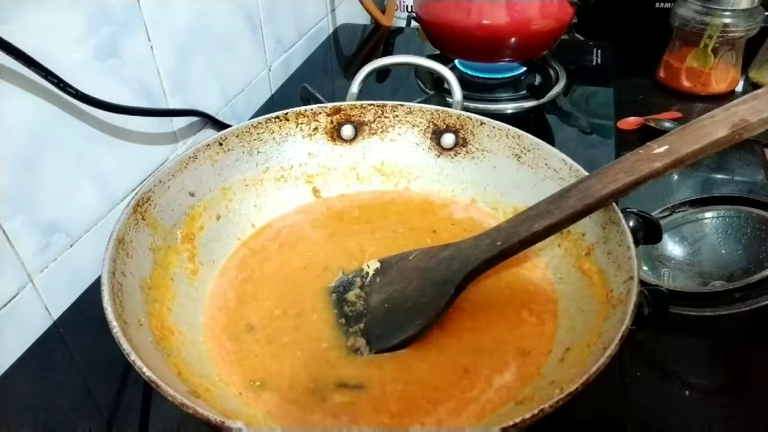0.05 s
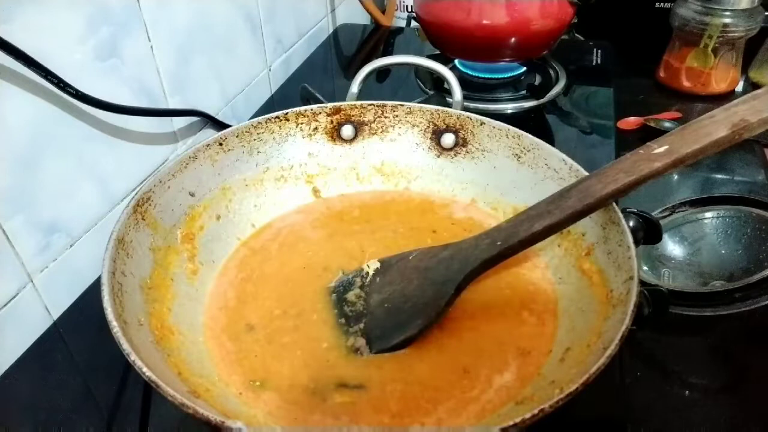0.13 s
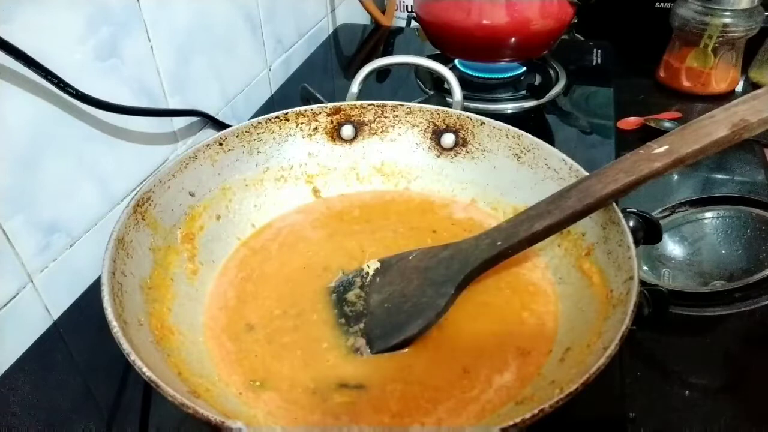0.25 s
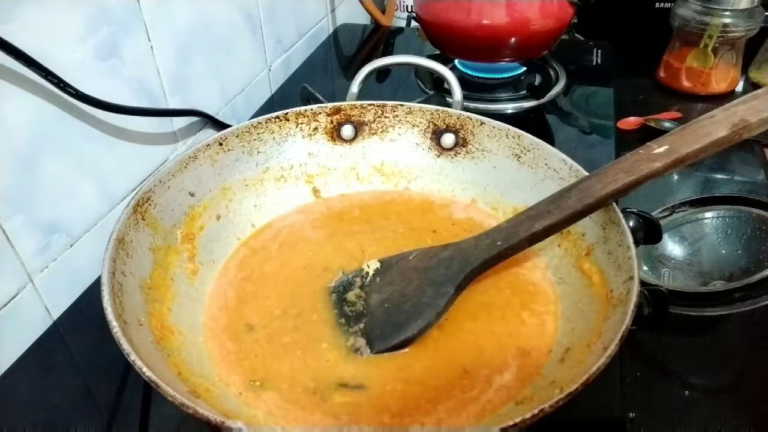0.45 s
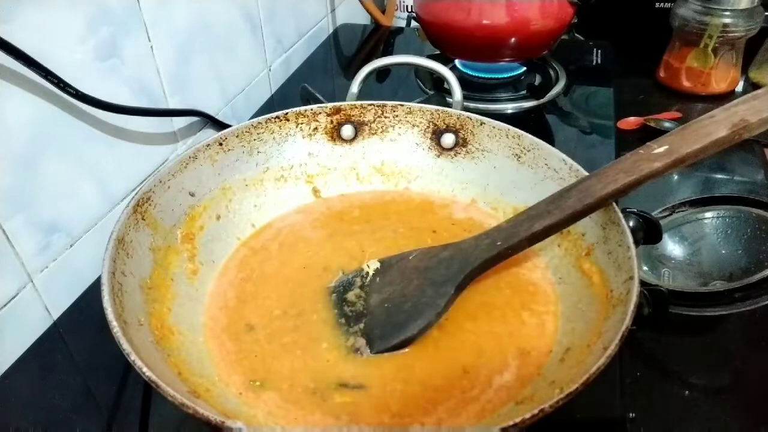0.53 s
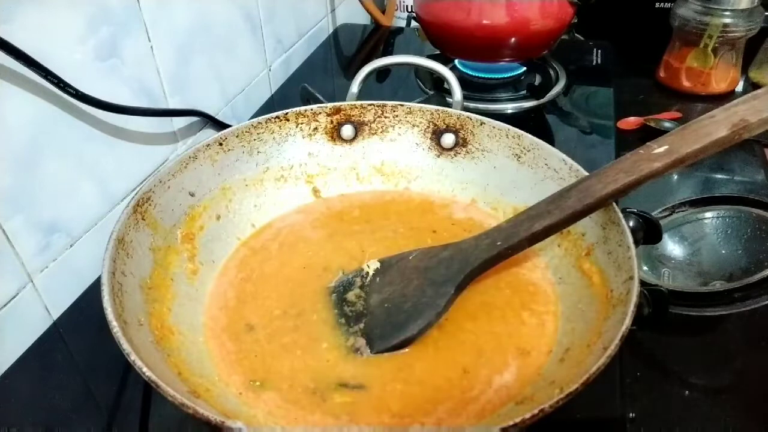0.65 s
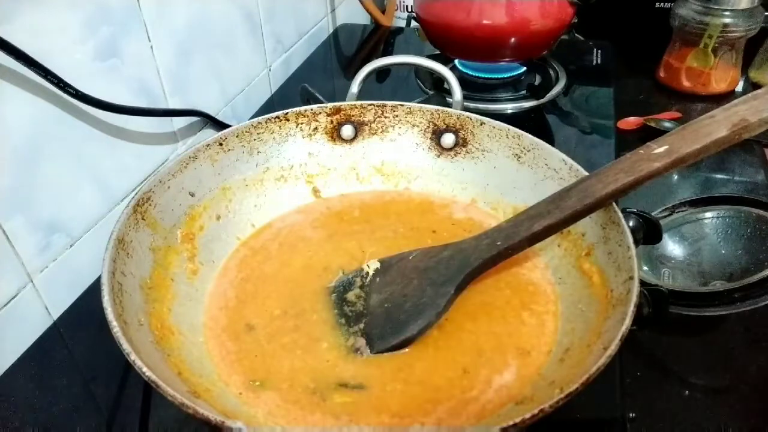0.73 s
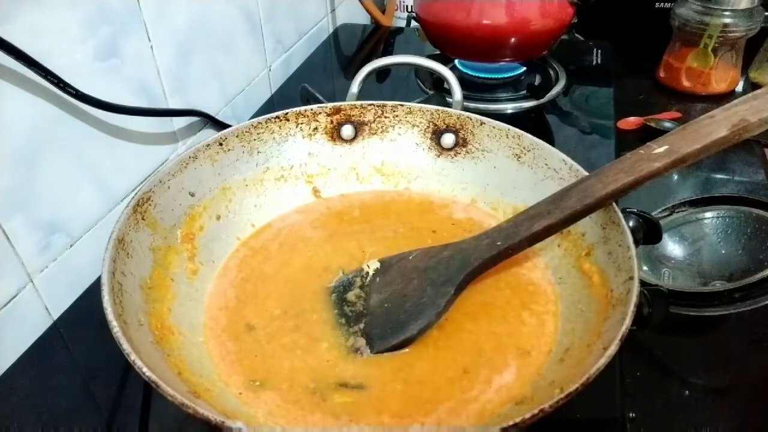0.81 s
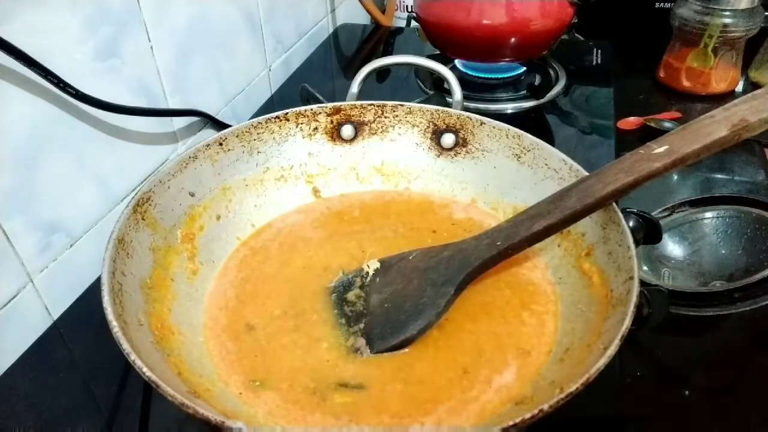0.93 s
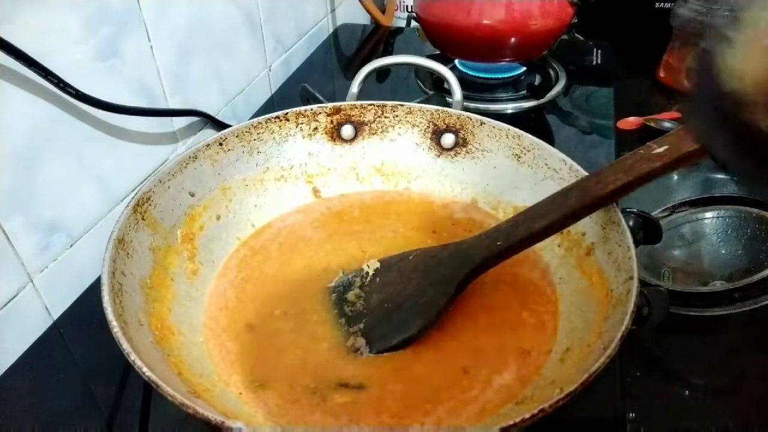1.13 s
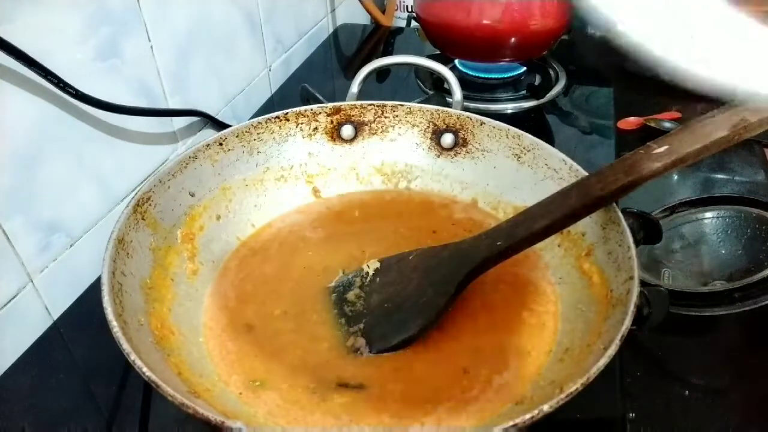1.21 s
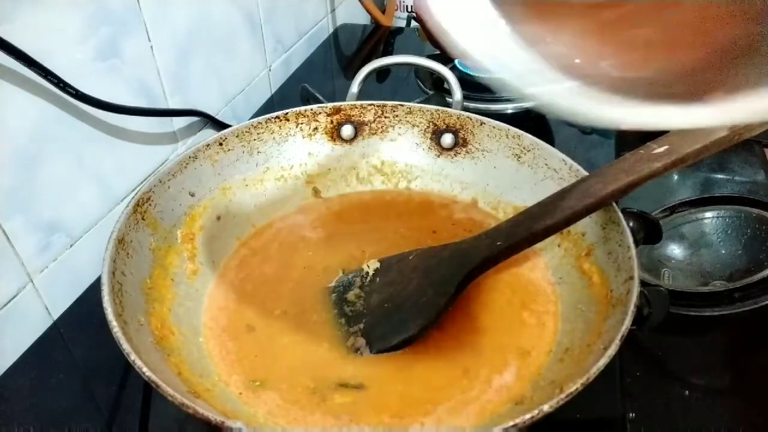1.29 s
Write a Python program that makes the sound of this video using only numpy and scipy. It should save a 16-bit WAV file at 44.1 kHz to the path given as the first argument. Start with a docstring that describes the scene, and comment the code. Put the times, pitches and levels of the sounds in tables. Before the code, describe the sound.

Sauce simmers in a metal pan throughout, with soft bubbling, a light hiss and a steady low fan hum. At about 0.25 seconds a hollow vessel knocks down on the counter nearby, louder than the rest, then scrapes and rocks to rest by 0.7 seconds with light rustles. From about 1 second, a faint metallic ring wavers with a few small ticks. The kitchen sounds small and hard-walled.

```python
"""Thin sauce simmers in a steel pan over a gas flame, with a fan motor humming in a hard-walled kitchen.
Bubbles burst and ring briefly over a noise bed of flame, fan air and fizz. A hollow vessel is put down
on the counter nearby, drags and rocks to rest, each contact ringing the modes of both. Light rustles,
ticks and a soft sagging note follow, and a thin metallic ring rises near the end."""
import sys
import numpy as np
from scipy import signal
from scipy.io import wavfile

SR = 44100
rng = np.random.default_rng(int(sys.argv[2]) if len(sys.argv) > 2 else 0)


def output_pcm(signal):
    """Save a mono or channel-first signal as 16-bit PCM at the path in sys.argv[1].

    Samples are clipped to [-1, 1] before scaling.
    """
    pcm = np.clip(np.atleast_2d(signal).T, -1, 1) * 32767
    wavfile.write(sys.argv[1], SR, np.round(pcm).astype(np.int16))


N = 59535
TIME = np.arange(N) / SR


def from_db(db):
    return 10 ** (np.asarray(db) / 20)


def unit_rms(x):
    return x / np.sqrt(np.mean(x ** 2) + 1e-20)


def butter(x, order, hz, kind):
    return signal.sosfilt(signal.butter(order, hz, kind, fs=SR, output="sos"), x)


def at_hz(curve, hz):
    """A curve's value at hz, on a log-frequency axis."""
    freqs, values = np.transpose(curve)
    return np.interp(np.log(hz), np.log(freqs), values)


def drift(rate_hz):
    """Smooth random modulation of rms 1."""
    pole = np.exp(-80 * np.pi * rate_hz / SR)   # one step every 40 samples
    slow = signal.lfilter([1], [1, -2 * pole, pole * pole], rng.standard_normal(N // 40 + 2002))[2000:]
    return np.interp(np.arange(N) / 40, np.arange(len(slow)), unit_rms(slow))


def resonate(drive, hz, t60):
    """One damped mode: a unit click sets a sine of height 1 ringing."""
    r, w = from_db(-60 / (t60 * SR)), 2 * np.pi * hz / SR
    return signal.lfilter([0, np.sin(w)], [1, -2 * r * np.cos(w), r * r], drive + 1e-18)


def diffuse_noise(gain_at, correlation):
    """Third-octave bands of mid/side noise: gain_at(hz) shapes each, correlation sets its width."""
    out, edges = 0, 25 * 2 ** (np.arange(30) / 3)
    white = rng.standard_normal((2, 2, N + 4000))
    for k, (low, high) in enumerate(zip(edges, edges[1:])):
        mid, side = butter(white[k % 2], 2, [low, high], "band")[:, -N:]
        hz = np.sqrt(low * high)
        alike = np.clip(at_hz(correlation, hz), -1, 1)
        out += gain_at(hz) * (np.sqrt(1 + alike) * mid + np.sqrt(1 - alike) * side * [[1], [-1]])
    return out


# EQ of the bed: f/Hz, relative level/dB
BED_EQ = [(25, -32), (60, -31), (100, -39), (140, -12.5), (230, -5.5), (330, -7.5), (500, -9.5), (620, -17),
          (1000, -20.5), (1800, -23), (4000, -26), (7000, -31), (10500, -30.5), (15800, -40.5)]
# slow level curve of the bed's treble, taken about its mean: t/s, level/dB
TREBLE_LEVEL = [(0, -54.5), (.2, -56.5), (.3, -51), (.42, -52.5), (.52, -55.5), (.62, -55), (0.762, -54.5),
                (.9, -58.5), (1.03, -54.5), (1.15, -56.5), (1.35, -55.5)]
# stereo image of the bed and the rustles: f/Hz, left-right correlation
NOISE_IMAGE = [(60, 0.7), (130, 1), (290, 0.099), (640, 0.46), (1410, -0.33), (3100, 0.14), (6820, -0.072),
               (15000, 0.068)]
def simmer(level_db=-46, flicker_db=1.6, treble_from_hz=1500):
    """Flame, fan air and fizz: a steady noise bed whose bands flicker."""
    times, ride_db = np.transpose(TREBLE_LEVEL)
    treble_db = np.interp(TIME, times, ride_db - ride_db.mean())
    sway_db = .5 * drift(8.0)   # all bands together

    def band_gain(hz):
        eq_db = at_hz(BED_EQ, hz) + treble_db * (hz > treble_from_hz)
        return from_db(eq_db + sway_db + flicker_db * drift(9.3))
    return from_db(level_db) * unit_rms(diffuse_noise(band_gain, NOISE_IMAGE))


def bubbles(per_s=220, level_db=-60.5, t60_cycles=13.6):
    """Soft bubbles burst at random, each ringing a few cycles at one of 16 pitches."""
    strengths = from_db(5.4 * np.minimum(rng.exponential(1, N), 2)) * rng.choice([-1, 1], N)
    bursts = strengths * (rng.random(N) < per_s / SR)
    pitch_index = rng.integers(0, 16, N)
    pops = sum(resonate(bursts * (pitch_index == k), hz, t60_cycles / hz)
               for k, hz in enumerate(np.geomspace(260, 1100, 16)))
    softened = signal.lfilter([.1], [1, -.9], pops)
    return from_db(level_db) * unit_rms(softened)


# tones of the fan motor: f/Hz, rms level/dB
MOTOR_TONES = [(150, -59.5), (232.5, -49.5), (311, -59.5), (466, -56.5), (522, -62.5)]
def fan_hum(waver_hz=1.24, waver_db=1.5, side_db=-34):
    """Near-mono motor tones that waver a little in pitch and level."""
    out = 0
    for hz, db in MOTOR_TONES:
        phase = 2 * np.pi * (np.cumsum(hz + waver_hz * drift(4.8)) / SR + rng.random())
        tone = np.sin(phase) + from_db(side_db) * np.cos(phase) * [[1], [-1]]
        out += np.sqrt(2) * from_db(db + waver_db * drift(7.7)) * tone
    return out


# the vessel lands and rocks: t/s, vessel drive/dB, counter drive/dB, contact length/ms
CONTACTS = [(0.2469, -4.5, -17, 0.69), (0.2608, -36, -12, 2.5), (.279, -23, -17.5, 0.96),
            (.296, -18.5, -31, 0.65), (.316, -9.5, -22, 0.83), (0.3314, -40, -14.5, 1.53),
            (.348, -14.5, -33, 1.25), (0.366, -14, -13.5, 1.38), (.381, -19.5, -51, 0.99),
            (.397, -17, -21, 1.82), (0.407, -29.5, -17, 0.94), (.431, -37, -18.5, 1.52),
            (.457, -28, -23, 2.3), (0.47, -39, -16, 4.36), (.497, -49, -23.5, 5.1), (.536, -45, -56, 0.47),
            (0.562, -60, -37, 1.54), (0.627, -34.5, -38.5, 1.4)]
def knocks(crack_db=-30.5, crack_t60_s=0.049, crack_db_per_db=2.2):
    """Force pulses on vessel and counter, and the envelope of the crack that tops hard hits."""
    forces, crack = np.zeros((2, N)), np.zeros(N)
    landing_db = CONTACTS[0][1]
    for start, vessel_db, counter_db, ms in CONTACTS:
        progress = np.clip((TIME - start) / (ms / 1000), 0, 1)
        pulse = np.sin(np.pi * progress) ** 2 * 2000 / (ms * SR)   # unit area
        forces += from_db([[vessel_db], [counter_db]]) * pulse
        peak_db = crack_db + crack_db_per_db * (vessel_db - landing_db)
        crack += from_db(peak_db - 60 * np.maximum(TIME - start, 0) / crack_t60_s) * (TIME >= start)
    return forces, crack


# the base drags as it rocks: t/s, vessel drive/dB, counter drive/dB, scrape level/dB
DRAG_RIDE = [(0.247, -93, -95, -60), (0.262, -64, -77, -58), (0.29, -58, -69, -49),
             (0.308, -73, -73.5, -50), (0.325, -61, -69.5, -54), (0.345, -64, -68, -68),
             (0.376, -59.5, -68, -53), (0.42, -69.5, -72, -61), (0.45, -78.5, -65.5, -69),
             (0.474, -81, -64, -68), (0.509, -79, -74, -58), (0.55, -95, -75.5, -79)]
def drag(lowpass_hz=1024):
    """Friction: dull rough forces on vessel and counter, and the envelope of a bright scrape."""
    times, *lanes_db = np.transpose(DRAG_RIDE)
    *drives, scrape = from_db([np.interp(TIME, times, db, left=-150, right=-150) for db in lanes_db])
    roughness = unit_rms(butter(rng.standard_normal((2, N)), 2, lowpass_hz, "low"))
    return drives * roughness, scrape


# modes of the vessel and of the counter: f/Hz, level/dB, t60/s, pan (left minus right)/dB
VESSEL_MODES = [(448, -7.5, 0.046, -5), (542, -10, 0.088, 1), (630, -4, 0.09, -6.5), (660.4, -11, 0.19, 9),
                (1000, -20.5, 0.079, -7), (1136, -12.5, 0.06, 2), (1177, -9, 0.055, 6.5),
                (1390, -31, 0.049, -2), (1578, -12, 0.026, -2)]
COUNTER_MODES = [(146, -28, 0.051, 5), (219.8, -13, 0.23, 2.5), (256.7, -7.5, 0.12, 0),
                 (323.5, -4.5, 0.059, -0.5), (374, -9, 0.056, -6)]
# EQ dips where the vessel radiates little: low f/Hz, high f/Hz, share removed (0-1)
BODY_DIPS = [(693, 970, 0.88), (1227, 1410, 0.58)]
def vessel(hiss_band_hz=(1880, 5100), left_lag_s=0.000264):
    """Knocks and drag ring the hollow vessel and the counter; crack and scrape add a bright edge."""
    knock_forces, crack = knocks()
    drag_forces, scrape = drag()
    hiss = unit_rms(butter(rng.standard_normal((2, N)), 1, hiss_band_hz, "band"))
    body = 0
    for force, modes in zip(knock_forces + drag_forces, (VESSEL_MODES, COUNTER_MODES)):
        for hz, db, t60, pan_db in modes:
            drive = np.gradient(force) * SR / (2 * np.pi * hz)
            body += from_db([[db + pan_db / 2], [db - pan_db / 2]]) * resonate(drive, hz, t60)
    for low_hz, high_hz, share in BODY_DIPS:
        body -= share * butter(body, 1, [low_hz, high_hz], "band")
    left, right = body + (crack + scrape) * hiss
    return np.array([np.interp(TIME - left_lag_s, TIME, left), right])


# rustle cues: peak t/s, rise/s, fall/s, level/dB
RUSTLE_CUES = [(0.471, 0.042, 0.037, -41), (0.558, 0.022, 0.041, -45.5), (0.687, 0.068, 0.043, -48.5)]
# EQ of the rustles: f/Hz, relative level/dB
RUSTLE_EQ = [(1060, 0.5), (1800, -0.5), (2780, -3.5), (3280, -7), (3590, 0), (6250, -2.5), (6850, 2),
             (12400, -4), (15800, -11)]
def rustles(flicker_db=3.3):
    """Light swells of bright, flickering noise."""
    swells = sum(from_db(db) * np.exp(-((TIME - peak) / np.where(TIME < peak, rise, fall)) ** 2)
                 for peak, rise, fall, db in RUSTLE_CUES)

    def band_gain(hz):
        return from_db(at_hz(RUSTLE_EQ, hz) + flicker_db * drift(31.0)) * (hz > RUSTLE_EQ[0][0])
    return swells * unit_rms(diffuse_noise(band_gain, NOISE_IMAGE))


# tick cues: t/s, f/Hz, resonance width/Hz, level/dB, t60/s
TICK_CUES = [(.551, 7140, 900, -46.5, 0.088), (.557, 4500, 220, -54, 0.25), (0.652, 3900, 448, -47, 0.1),
             (.921, 4800, 300, -62, 0.081), (1.088, 3710, 60, -60, 0.2), (1.148, 3760, 70, -54, 0.25),
             (1.268, 5360, 970, -46.5, 0.29), (1.267, 4800, 250, -50, 0.08), (1.268, 8950, 1200, -54, 0.24),
             (1.316, 2050, 300, -50.5, 0.058)]
def ticks():
    """Small rough ticks: dying bursts of noise, pitched by two passes through a resonance."""
    out = 0
    for start, hz, width_hz, db, t60 in TICK_CUES:
        filter_t60 = np.log(1000) / (np.pi * width_hz)
        noise = resonate(resonate(rng.standard_normal((2, N)), hz, filter_t60), hz, filter_t60)
        envelope = from_db(db - 60 * np.maximum(TIME - start, 0) / t60) * (TIME >= start)
        out += envelope * unit_rms(noise)
    return out


def settling_note(peak_s=0.662, rise_s=0.03, fall_s=0.045, level_db=-35.5,
                  centre_hz=222, sag_hz=16, sag_s=0.012):
    """A soft low note swells and sags in pitch as the vessel settles."""
    t = TIME - peak_s
    hz = centre_hz - sag_hz * np.tanh(t / sag_s)
    swell = np.exp(-(t / np.where(t < 0, rise_s, fall_s)) ** 2)
    return from_db(level_db) * swell * np.sin(2 * np.pi * np.cumsum(hz) / SR)


# fader rides on the ring: t/s, main tone level/dB, lower tone level/dB
RING_RIDE = [(0.95, -77, -85), (0.992, -72, -87), (1.026, -58.5, -80), (1.056, -58, -74), (1.094, -63, -62),
             (1.144, -62, -62), (1.166, -49, -61), (1.204, -55.5, -70), (1.23, -63, -61),
             (1.264, -47.5, -64), (1.298, -68, -71), (1.314, -53, -67), (1.35, -61, -59)]
# main and lower tone of the ring: f/Hz, rms pitch waver/Hz
RING_TONES = [(3362, 10), (3030, 10)]
def thin_ring(flutter_db=2.5, flutter_hz=50):
    """Two thin metallic tones that waver, flutter, and come and go."""
    times, *lanes_db = np.transpose(RING_RIDE)
    spread = np.array([[0], [0.25]])   # right leads by a quarter cycle
    out = 0
    for (hz, waver_hz), db in zip(RING_TONES, lanes_db):
        envelope = from_db(np.interp(TIME, times, db, left=-120) + flutter_db * drift(flutter_hz))
        cycles = np.cumsum(hz + waver_hz * drift(26.0)) / SR + rng.random()
        out += envelope * np.sin(2 * np.pi * (cycles + spread))
    return np.sqrt(2) * out


# reverb time of the kitchen: f/Hz, t60/s
REVERB_DECAY = [(120, .35), (250, .4), (600, .27), (1200, .24), (3000, .4), (8000, .3)]
# stereo image of the reverb: f/Hz, left-right correlation
REVERB_IMAGE = [(60, 0.52), (130, 0.74), (290, 1), (640, 0.58), (1410, -0.98), (3100, 0.28), (6820, 1),
                (15000, 0.13)]
def kitchen_reverb(send, wet_db=-8, predelay_s=0.0042):
    """Hard walls return a diffuse tail that dies band by band."""
    tail = diffuse_noise(lambda hz: from_db(-60 * TIME / at_hz(REVERB_DECAY, hz)), REVERB_IMAGE)
    tail *= np.clip(TIME / predelay_s - 1, 0, 1)   # silent, then fades in over the same time
    tail /= np.sqrt(np.sum(tail ** 2) / 2)
    return from_db(wet_db) * signal.fftconvolve(send, tail, axes=1)[:, :N]


def scene(low_cut_hz=135.6):
    """Vessel and bubbles get reverb and a low cut; the other layers join the mix dry."""
    near = vessel() + bubbles()
    near = butter(near + kitchen_reverb(near), 6, low_cut_hz, "high")
    return near + settling_note() + ticks() + rustles() + thin_ring() + fan_hum() + simmer()


def record(dry):
    """A steep high cut at 15780 Hz on the whole mix."""
    return signal.sosfilt(signal.ellip(10, .5, 60, 15780, fs=SR, output="sos"), dry)


dry = scene()
out = record(dry)
output_pcm(out)
```